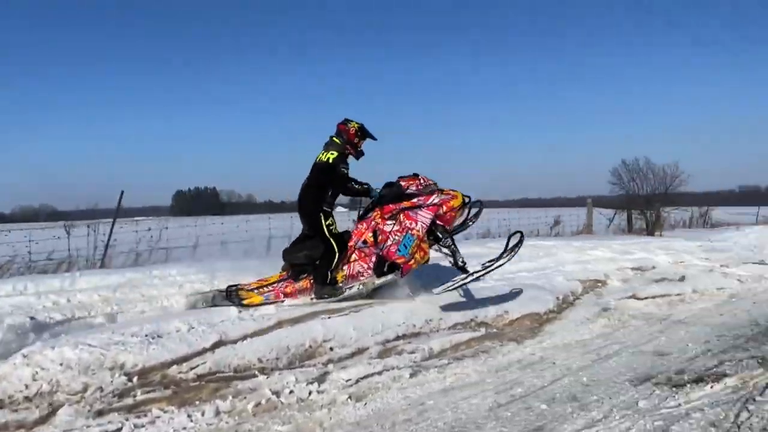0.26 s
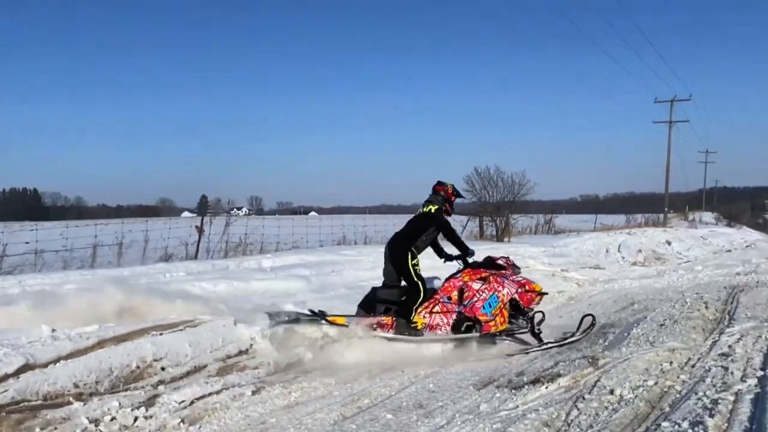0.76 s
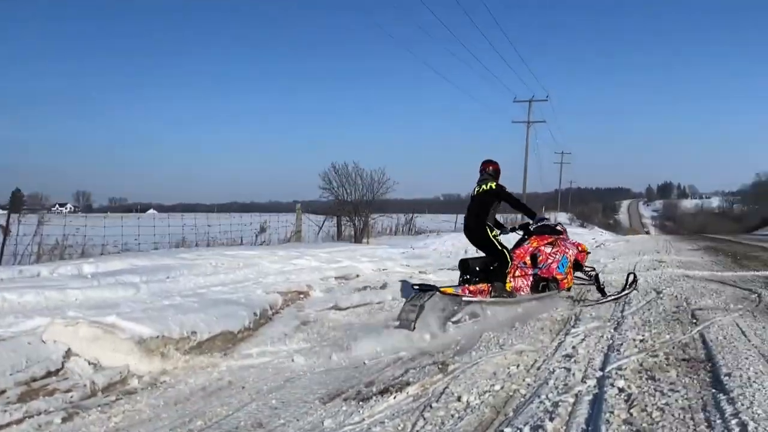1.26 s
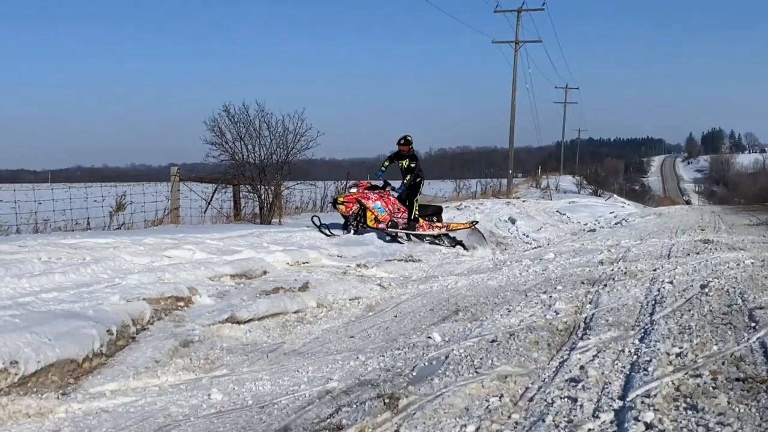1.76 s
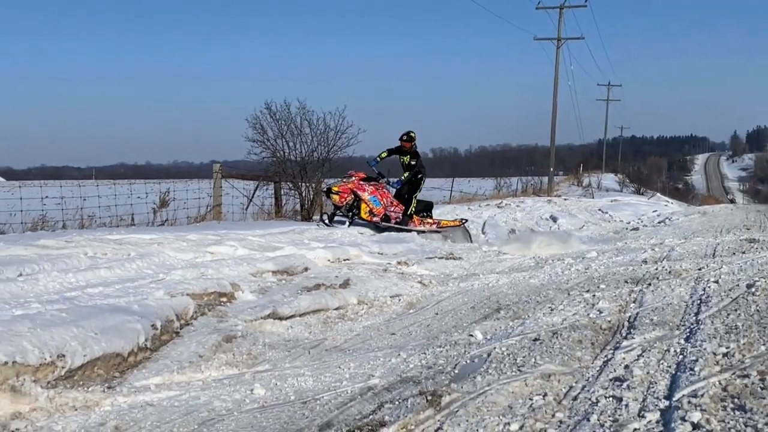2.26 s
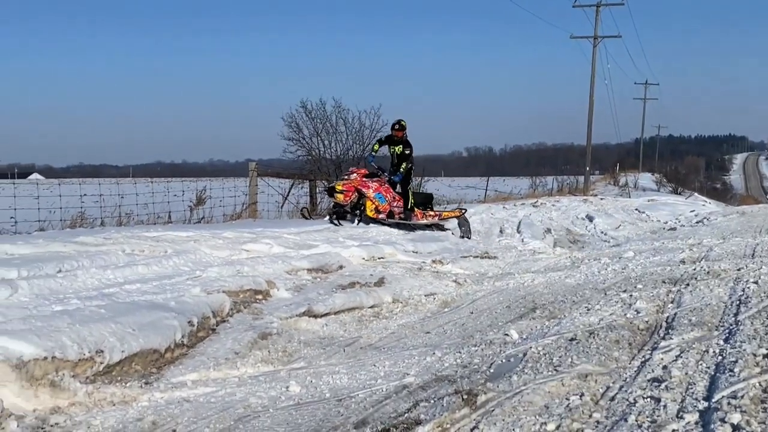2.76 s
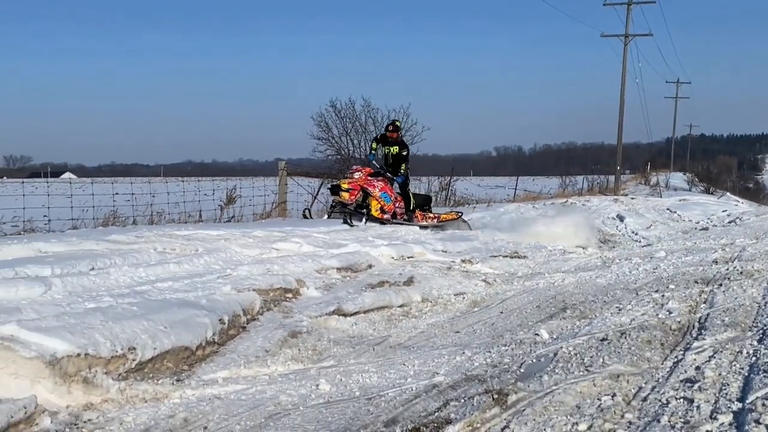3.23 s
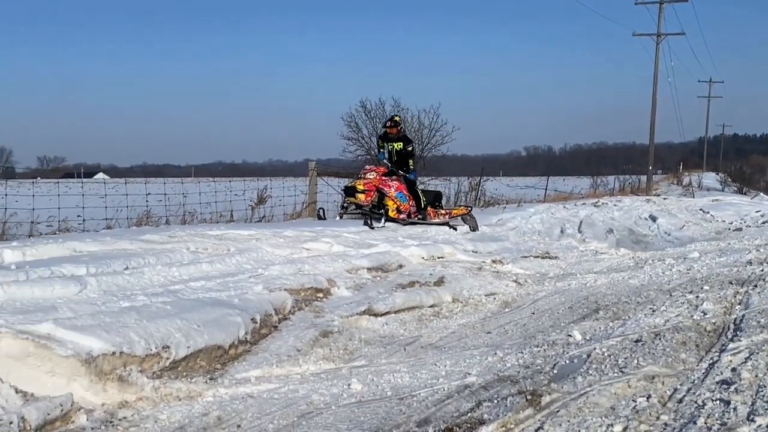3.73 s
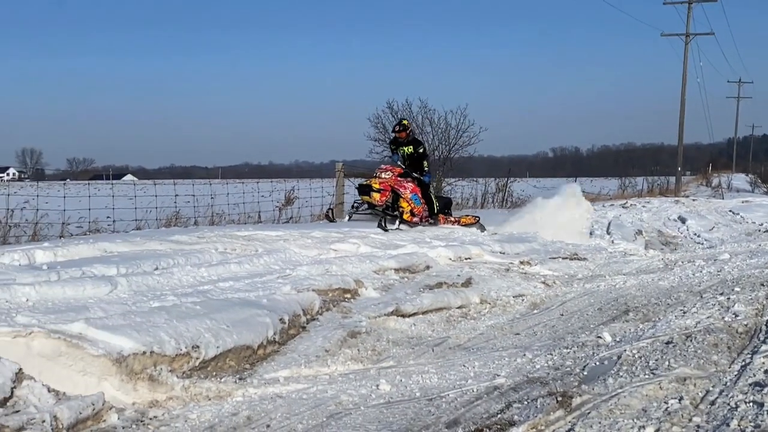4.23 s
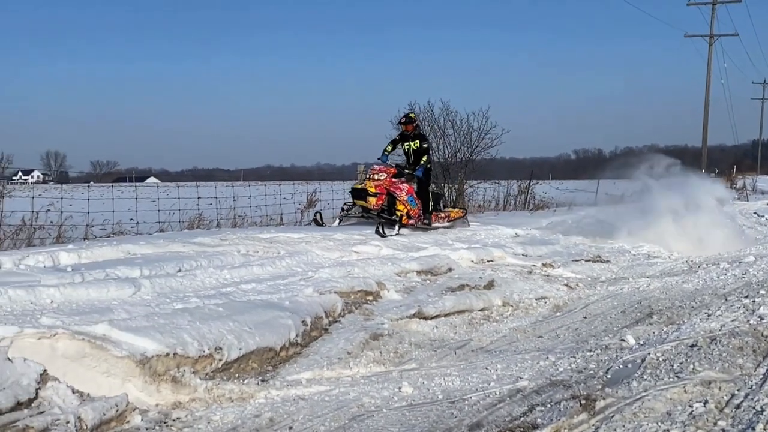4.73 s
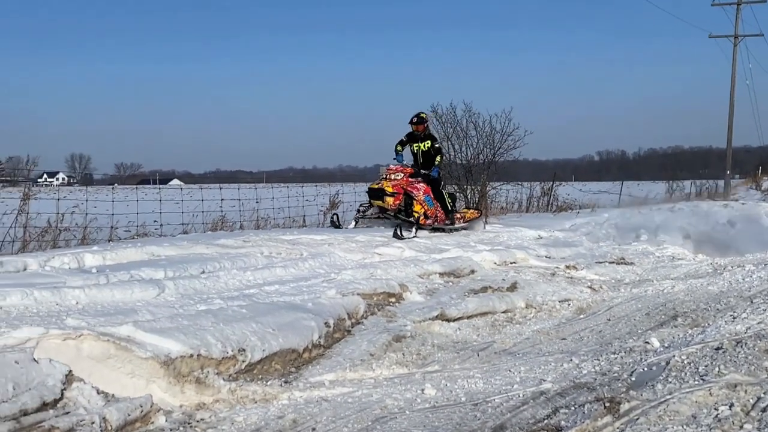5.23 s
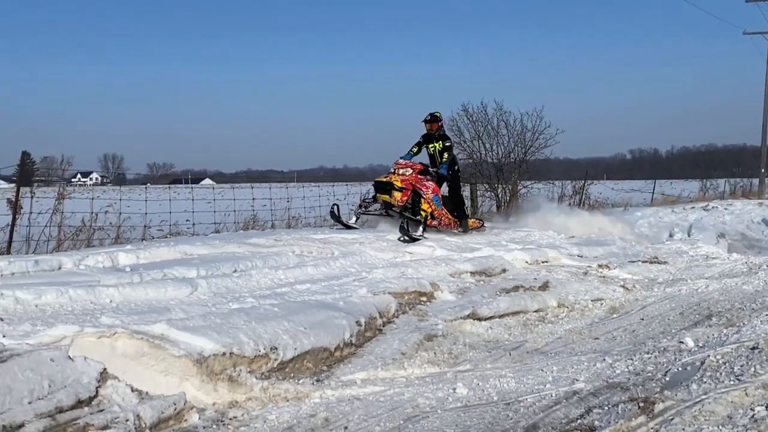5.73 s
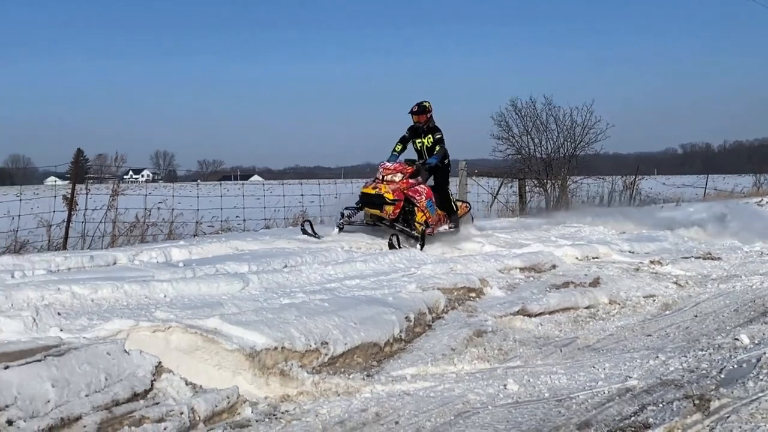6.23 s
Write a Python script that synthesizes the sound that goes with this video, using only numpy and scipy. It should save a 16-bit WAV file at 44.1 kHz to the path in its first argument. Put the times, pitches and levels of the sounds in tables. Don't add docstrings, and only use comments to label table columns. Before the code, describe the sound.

Raspy two-stroke sled revs hard, drops to a rattling idle, then repeats blips that build to one long loud scream, over faint wind rumble.

```python
import sys
import numpy as np
from scipy import signal
from scipy.fft import rfft, irfft, next_fast_len
from scipy.io import wavfile
from scipy.ndimage import uniform_filter1d

SR = 44100
rng = np.random.default_rng(int(sys.argv[2]) if len(sys.argv) > 2 else 0)


def rack_gain(trim_db):
    fader = np.asarray(trim_db, float)
    return 10 ** (fader / 20)


def dump(signal):
    limited = np.clip(np.atleast_2d(signal).T, -1, 1)
    pcm = np.round(limited * 32767).astype(np.int16)
    wavfile.write(sys.argv[1], SR, pcm)


N = 286209

CUT_S = 1.7303
T = np.arange(N) / SR
REAR = T < CUT_S

# time in seconds, firing rate in Hz, bark in dB.
REAR_BLIPS_S_HZ_DB = [
    [(-.5, 268.8, -37), (.07, 262.3, -25), (.11, 255.6, -29), (.156, 246, -34.5), (.212, 245.8, -31),
     (.345, 251.3, -30), (.53, 242.4, -32), (.64, 233.6, -36.5), (.72, 215.2, -43)],
    [(1.13, 150.7, -51.5), (1.25, 167.3, -48), (1.32, 159.5, -56)],
]
FRONT_BLIPS_S_HZ_DB = [
    [(1.7303, 201.3, -51), (1.81, 180.8, -48), (1.865, 183, -42.5), (1.936, 202.2, -39.5),
     (2.022, 217.7, -41), (2.07, 204.2, -47)],
    [(2.58, 155, -48), (2.7, 168.9, -45.5), (2.79, 209.7, -42.5), (2.88, 219.1, -39), (2.96, 213, -42.5)],
    [(3.63, 146.1, -50.5), (3.72, 174.9, -41.5), (3.778, 211.3, -38.5), (3.8, 211, -40),
     (3.904, 226.9, -36.5), (3.998, 250.4, -34.5), (4.072, 261.5, -35), (4.11, 265.6, -34),
     (4.135, 260.6, -38)],
    [(4.93, 139, -49), (5.05, 159.7, -41.5), (5.166, 209.7, -35), (5.2, 209, -34), (5.31, 226.1, -27.5),
     (5.43, 255.1, -21), (5.525, 266.4, -22), (5.966, 263.6, -17), (5.998, 251.2, -19.5)],
    [(6.09, 207, -41.5), (6.195, 175.1, -40.5), (6.29, 157.4, -46)],
]
# regular firing share of bark 0-1, weak cylinder under strong in dB,
# time to steady in seconds.
BURN_SHARE_DB_S = [(.975, 2, .1), (.85, 2, .05), (.76, 5, .1), (.8, 7, .15), (.88, 9, .12),
                   (.994, 1.5, .16), (.8, 3, .04)]
# settled firing rate in Hz, sag time in seconds, clatter at idle in dB.
COASTS_HZ_S_DB = [(153.6, .08, -56.5), (139, .2, -58.5), (149, 0.13, -48), (142, .19, -50),
                  (139, .18, -49.5), (138.5, .2, -47), (143.6, .1, -46.5)]
SAG_SHAPE, IDLE_HZ, CLATTER_DB_PER_HZ = 1.15, 150.3, 0.1022
COAST_SHARE, COAST_WEAK_DB = 0.1, 3
# order 1 in dB, order 2 in dB, order 3 in dB.
BLIP_TONES_DB = [(2, 1.5, -2), (-2, 8, -3.5), (-3, -7, -3.5), (-3.5, -8.5, -3.5), (-2.5, -3.5, -5),
                 (1, -1.5, -0.5), (1.5, -4, -9)]
# order 1 in dB, order 2 in dB, order 3 in dB.
COAST_TONES_DB = [(-8, 0, -6.5), (0, -3, -1), (-12.5, -4, -9), (-10, -14, -15), (-7, -5.5, -4), (-3, -1, 4),
                  (-8.5, -4, 0.5)]
OVERRUN_DB_PER_HZ = 0.22
# time in seconds, lift in dB.
SURGES_S_DB = [
    (2.85, 3.2),
    (3.88, 4.6),
    (3.965, 2),
    (5.17, 0.83),
    (5.32, 4.4),
    (5.435, 1.1),
    (5.7, 2.4),
]
SURGE_S = 0.02

# start in seconds, end in seconds, extra sizzle in dB.
WIDE_OPEN_S_DB = [
    (-.5, 0.124, 15),
    (0.133, 0.539, 15),
    (1.18, 1.324, 4.5),
    (3.86, 4.134, 8),
    (5.367, 5.994, 10),
]
# rear in dB, front in dB.
SIZZLE_DB = [-12, -11]
# rear in dB, front in dB.
PART_THROTTLE_DB = [-6.5, -3.5]
VALVE_S, RASP_DB = 0.041, 1

ORDERS_HEARD = (1, 2, 2.5, 3)
ORDER_DB = [-3, 0.5, -19.5, 4.5]
TONES_FOLLOW = [0.68, 0.77, 1, 0.7]
# frequency in Hz, gain over bark in dB.
TONES_REAR_HZ_DB = [(150, 4.5), (175, 26), (250, -6), (340, -16), (500, 4), (670, -17.5), (745, 5),
                    (790, -15.5)]
# frequency in Hz, gain over bark in dB.
TONES_FRONT_HZ_DB = [(150, 10), (200, 2), (262, -11), (292, -4.5), (380, -8), (520, -0.5), (660, -14),
                     (780, -5.5)]

# frequency in Hz, gain in dB.
PIPE_REAR_HZ_DB = [(400, -64.5), (520, 22), (760, -1), (1000, 2), (1300, -8.5), (1500, -2), (3000, -10),
                   (4400, -15), (5500, -35.5), (6600, -20), (8500, -27), (10000, -50), (15000, -91)]
# frequency in Hz, gain in dB.
PIPE_FRONT_HZ_DB = [(400, -14), (1040, 2.5), (1300, -5.5), (1800, -7.5), (2300, -9), (3800, -12),
                    (6300, -18), (7500, -24.5), (8300, -30.5), (11000, -34.5), (12200, -45), (13500, -93),
                    (14500, -38), (16000, -45)]
# time in seconds, hood delay in ms, hood strength as a ratio,
# snow delay in ms, snow strength as a ratio.
ECHOES_S_MS = [(0, .45, 0.15, 1.4, 0.47), (.12, 0.83, 0.21, .86, .48), (.16, 0.84, -.56, 1.14, -.06),
               (.4, 0.88, -0.74, 1.4, 0.6), (.52, 0.78, 0.03, 1.01, .9), (1.72, .5, 0.021, 0.64, .26),
               (4.0, 0.56, -0.035, 0.64, 0.23), (5.1, 0.69, -0.51, 0.9, 0.076),
               (5.35, 0.93, -0.041, 1.1, 0.52), (6.0, .88, -0.34, 1.144, .05)]
# time in seconds, resonance in Hz, level over direct sound in dB.
RING_S_HZ_DB = [(0, 1563, -63), (.3, 2570, 17.5), (.52, 2380, -19), (.58, 1200, 15.5), (1.7, 1190, -19),
                (1.74, 1730, 32), (2.2, 1760, 12), (2.75, 2307, 3), (3.65, 2346, 16), (4.13, 2240, 4),
                (5.2, 2000, -5), (6.0, 1830, 4.5)]

# frequency in Hz, density in dB per Hz.
CLATTER_REAR_HZ_DB = [(88, -23), (150, -13.5), (299, -19), (335, -20.5), (435, -17), (486, -6.5),
                      (608, -20), (1900, -18.5), (2250, -25), (3790, -27.5), (13000, -55)]
# frequency in Hz, density in dB per Hz.
CLATTER_FRONT_HZ_DB = [(88, -20), (150, -3.5), (191, -10), (210, -24), (283, -19), (382, -13), (435, -12),
                       (656, -12), (851, -11), (1760, -13.5), (7290, -37.5), (10400, -53.5), (13000, -88)]
# frequency in Hz, width in Hz, level in dB.
COWL_HZ_DB = [(1050, 300, 2), (1850, 220, 2), (2350, 200, -3)]
# rear in dB, front in dB.
IDLE_DB = [-66.5, -57.5]

# frequency in Hz, density in dB per Hz.
WIND_HZ_DB = [(15, -44), (25, -28), (42, 1), (59, 1.5), (76, 10), (118, 7), (156, -6), (220, -0.5),
              (290, -12), (480, -120)]
# time in seconds, lift in dB.
GUSTS_S_DB = [
    (.81, 5),
    (1.12, 2),
    (1.74, 3),
    (2.09, 7),
    (2.45, 6.5),
    (4.14, 7.5),
    (5.69, 10.5),
    (6.329, 8),
    (6.5, 2.5),
]
WIND_DB, GUST_S = -49.5, 0.09

# time in seconds, crack in dB, thump in dB,
# second firing two cycles on in dB.
POPS_S_DB = [(.788, -24, -45, 9), (0.835, -30, -33, -1), (0.854, -30, -44, 4.5), (.945, -27.5, -35, 1.5),
             (1, -31.5, -37, -20), (1.059, -33, -33, -7), (1.092, -28.5, -30.5, -19),
             (1.137, -29.5, -35, -25), (1.4, -33.5, -36.5, 7.5), (1.52, -32.5, -35, 2),
             (1.554, -37.5, -33.5, -15), (1.668, -32.5, -27.5, -14), (3.18, -28, -38.5, -11),
             (3.298, -30.5, -41.5, 0), (3.358, -35, -38, -20), (3.498, -32, -38, -21),
             (3.56, -34, -38.5, -4), (4.17, -24, -50, -13), (4.404, -25.5, -37, 0.5),
             (4.515, -25.5, -33.5, -15), (4.596, -29, -32.5, -28), (4.665, -24.5, -35, -20),
             (4.738, -26, -31.5, -11), (4.815, -26, -32.5, -3), (4.929, -23.5, -35, -3),
             (6.04, -14, -28.5, -9), (6.301, -20.5, -32, 9), (6.319, -21.5, -33, -43),
             (6.426, -21.5, -27, 2), (6.45, -21.5, -30, -7)]

# time in seconds, left over right in the bass in dB, in the treble in dB.
PAN_S_DB = [(0.0, -8, -6.5), (.99, -7, -4), (1.7, -7.5, 0), (2.4, -6.5, 0.5), (6.49, -4.5, -0.5)]
# frequency in Hz, left lead in radians.
PORTS_HZ_RAD = [(5000, 0.82), (7700, 0.5), (8200, 2), (9000, 1.5), (10400, 1.22), (11700, 0.8),
                (12500, -2.5)]


def read(points, hz):
    f, value = np.transpose(points)
    return np.interp(np.log(hz + 1), np.log(f + 1), value)


def curves(rows):
    s, *columns = np.transpose(rows)
    return [np.interp(T, s, c) for c in columns]


def colour(x, points):
    gain_db = np.maximum(read(points, abs(np.fft.fftfreq(4096, 1 / SR))), -100)
    log_gain = np.log(rack_gain(gain_db))
    response = np.exp(np.conj(signal.hilbert(log_gain)))
    impulse = np.fft.ifft(response).real[:2048]
    return signal.oaconvolve(x, impulse)[:N]


def shaped(x, gain_at):
    size = next_fast_len(N + 8192)
    padded = np.pad(x, [(0, 0)] * (x.ndim - 1) + [(4096, 4096)], "reflect")
    spectrum = rfft(padded, size) * gain_at(np.fft.rfftfreq(size, 1 / SR))
    return irfft(spectrum, size)[..., 4096:4096 + N]


def band(x, lo_hz, hi_hz):
    def edge(f, hz):
        return 0.5 + 0.5 * np.tanh(6 * np.log2((f + 1) / hz))
    return shaped(x, lambda f: edge(f, lo_hz) - edge(f, hi_hz))


def levelled(x, by, size=3000):
    return x / np.sqrt(abs(uniform_filter1d(by ** 2, size)) + 1e-14)


def resonate(x, hz, width_hz):
    turn = np.exp(2j * np.pi * np.cumsum(hz * np.ones(N)) / SR)
    r = np.exp(-np.pi * width_hz / SR)
    return 2 * (turn * signal.lfilter([1 - r], [1, -r], x / turn)).real


def wander(size):
    x = uniform_filter1d(uniform_filter1d(rng.standard_normal(N), size), size)
    return x / x.std()


def throttle():
    out = np.zeros((7, N))
    blips = REAR_BLIPS_S_HZ_DB + FRONT_BLIPS_S_HZ_DB
    for blip, (top_share, weak_db, catch_s), (settle_hz, sag_s, idle_db), on_db, off_db in zip(
            blips, BURN_SHARE_DB_S, COASTS_HZ_S_DB, BLIP_TONES_DB, COAST_TONES_DB):
        start_s, end_s = blip[0][0], blip[-1][0]
        hz, bark_db = curves(blip)

        caught = 1 - np.exp(-np.maximum(T - start_s, 0) / catch_s)
        burn_share = COAST_SHARE + (top_share - COAST_SHARE) * caught
        burn = [hz, bark_db, burn_share, weak_db + 0 * T]
        burn += [db - 1.5 * (1 - caught) for db in on_db]

        sag = np.exp(-(np.maximum(T - end_s, 0) / sag_s) ** SAG_SHAPE)
        coast_hz = settle_hz + (hz - settle_hz) * sag
        coast_db = idle_db + CLATTER_DB_PER_HZ * (coast_hz - IDLE_HZ)
        coast = [coast_hz, coast_db, COAST_SHARE + 0 * T, COAST_WEAK_DB + 0 * T]
        coast += [db - OVERRUN_DB_PER_HZ * (coast_hz - settle_hz) for db in off_db]

        out = np.where(T >= start_s, np.where(T < end_s, burn, coast), out)
    out[1] += sum(db * np.exp(-((T - s) / SURGE_S) ** 2) for s, db in SURGES_S_DB)
    return uniform_filter1d(out, size=350, axis=1)


def sizzle(share):
    valve_db = sum(db * (1 - np.exp(-np.maximum(T - start_s, 0) / VALVE_S)) * (T < end_s)
                   for start_s, end_s, db in WIDE_OPEN_S_DB)
    burn_db = np.where(REAR, *SIZZLE_DB) + np.where(REAR, *PART_THROTTLE_DB) * share
    return burn_db + uniform_filter1d(valve_db, size=500) + RASP_DB * wander(size=500)


def firing_tones(turns, hz, bark_db, share, tones_db, uneven):
    tones = 0
    for k, order_db, follow, tone_db in zip(ORDERS_HEARD, ORDER_DB, TONES_FOLLOW, tones_db):
        pipe_db = np.where(REAR, read(TONES_REAR_HZ_DB, k * hz), read(TONES_FRONT_HZ_DB, k * hz))
        level_db = follow * (bark_db + 42) - 42 + tone_db + order_db + pipe_db
        tones = tones + rack_gain(level_db) * np.cos(2 * np.pi * k * (turns - 0.33))
    misfires = rack_gain(2.5 * (1 - share) * wander(size=500))
    return np.sqrt(2) * tones * misfires * uneven ** 0.5


def port_cracks(turns, share, uneven):
    ignition = (0.001 + 0.012 * (1 - share)) * wander(size=150)
    timing = turns + ignition + 0.0015 * np.cos(np.pi * turns)
    cycles = np.arange(int(turns[-1]) + 2)
    scatter = rack_gain(np.interp(turns, cycles, 0.45 * rng.standard_normal(len(cycles))))
    return sum(np.cos(2 * np.pi * k * timing) for k in range(4, 62)) * scatter * uneven


def pipe(x):
    direct = np.where(REAR, colour(x, PIPE_REAR_HZ_DB), colour(x, PIPE_FRONT_HZ_DB))
    dull = band(direct, 20, 4200)
    hood_ms, hood, snow_ms, snow = curves(ECHOES_S_MS)
    echoes = hood * np.interp(T - hood_ms / 1000, T, dull)
    echoes = echoes + snow * np.interp(T - snow_ms / 1000, T, dull)
    lags = (7, 13, 22, 34, 58, 77, 104, 131)
    glints = sum(wander(size=3000) * np.roll(direct, lag) for lag in lags)
    ring_hz, ring_db = curves(RING_S_HZ_DB)
    panel = rack_gain(ring_db) * resonate(direct, ring_hz, 120)
    return direct + echoes + 0.19 * glints + panel


def clatter(turns):
    gate = 1 + 0.13 * np.exp(-(turns % 1) / 2.2)
    noise = rng.standard_normal(N) * gate * rack_gain(0.66 * wander(size=300))
    noise = noise + sum(rack_gain(db) * resonate(noise, hz, width_hz) for hz, width_hz, db in COWL_HZ_DB)
    return np.where(REAR, colour(noise, CLATTER_REAR_HZ_DB), colour(noise, CLATTER_FRONT_HZ_DB))


def engine():
    hz, bark_db, share, weak_db, first_db, second_db, third_db = throttle()
    turns = np.cumsum(hz) / SR
    sizzle_db = sizzle(share)
    uneven = rack_gain(weak_db * np.cos(np.pi * turns) / 2)
    tones_db = (first_db, second_db, second_db, third_db)
    out = firing_tones(turns, hz, bark_db, share, tones_db, uneven)
    bark = pipe(port_cracks(turns, share, uneven))

    crisp = share ** 2.5
    for layer, low_part, top_part in ((bark, share, crisp), (clatter(turns), 1 - share, 1 - crisp)):
        low, top = band(layer, 140, 3000), band(layer, 3000, 20000)
        out = out + np.sqrt(low_part) * rack_gain(bark_db) * levelled(low, band(layer, 900, 3000))
        out = out + np.sqrt(top_part) * rack_gain(bark_db + sizzle_db) * levelled(top, top)

    steady = clatter(turns)
    out = out + rack_gain(np.where(REAR, *IDLE_DB)) * levelled(steady, band(steady, 900, 3000))
    return out, hz


def wind():
    gust_db = sum(db * np.exp(-((T - s) / GUST_S) ** 2) for s, db in GUSTS_S_DB)
    gust = rack_gain(WIND_DB + gust_db + 2.0 * wander(size=1500))
    a, b = (colour(rng.standard_normal(N), WIND_HZ_DB) for _ in range(2))
    ports = np.array([0.85 * a + 0.15 * b, 1.1 * a - 0.15 * b])
    return gust * ports / band(a, 40, 120).std()


def pops(hz):
    s, crack_db, thump_db, second_db = np.transpose(POPS_S_DB)
    s = np.append(s, s + 2 / np.interp(s, T, hz))
    crack_db = np.append(crack_db, crack_db + second_db - 7)
    thump_db = np.append(thump_db, thump_db + second_db)
    cracks, thumps = np.zeros((2, N))
    cracks[((s + 0.0008) * SR).astype(int)] = rack_gain(crack_db + 8)
    thumps[((s + 0.006) * SR).astype(int)] = rack_gain(thump_db + 47.0)

    tick = colour(cracks, [(500, -12), (1900, -0.5), (4000, -2.5), (6000, -42), (9000, -35)])
    tick = tick * rack_gain(np.where(REAR, 2, -8))
    can = rack_gain(20.5) * resonate(cracks, 950, 240)
    can = can + rack_gain(26.0) * resonate(resonate(cracks, 490, 130), 403, 210)
    decay = signal.lfilter([1], [1, -np.exp(-1 / (0.009 * SR))], cracks)
    rattle = decay * band(rng.standard_normal(N), 450, 2190)
    putt = colour(can + 0.25 * rattle, [(3000, -3.0), (9000, -43.0)])
    boom = resonate(resonate(thumps, hz, 60), hz, 77)
    return tick + putt + boom


def scene():
    motor, hz = engine()
    motor = motor + pops(hz)
    bass, treble = band(motor, 1, 1200), band(motor, 1200, 30000)
    bass_db, treble_db = curves(PAN_S_DB)
    left = bass * rack_gain(bass_db / 2) + treble * rack_gain(treble_db / 2)
    right = bass * rack_gain(-bass_db / 2) + treble * rack_gain(-treble_db / 2)
    tail = rng.standard_normal(900) * np.exp(-np.arange(900) / 110.0) / 10
    scatter = rack_gain(-19) * signal.oaconvolve(motor, tail)[:N]
    return np.array([left + scatter, right - scatter]) + wind()


def roll_off(x):
    return signal.sosfilt(signal.butter(12, 16890, fs=SR, output="sos"), x)


def record(dry):
    phase_points = [(1000, 0.032)] + PORTS_HZ_RAD
    out = shaped(dry, lambda f: np.exp([[0.5j], [-0.5j]] * read(phase_points, f)))
    tick = rack_gain(-38.5) * (np.arange(N) == round(CUT_S * SR))
    return roll_off(out + tick)


dry = scene()
out = record(dry)
dump(out)
```